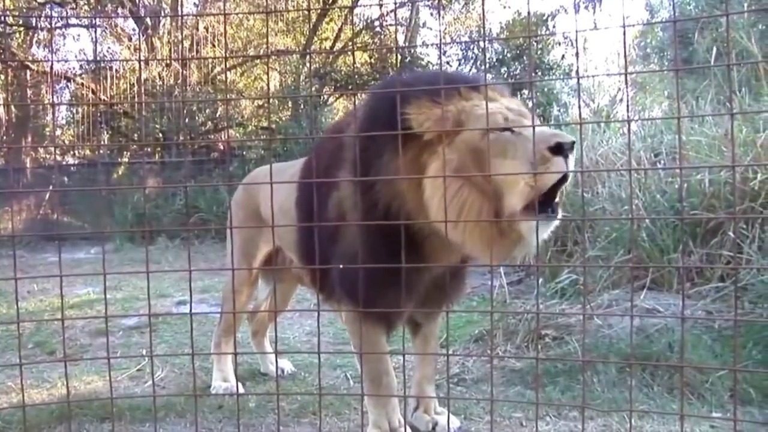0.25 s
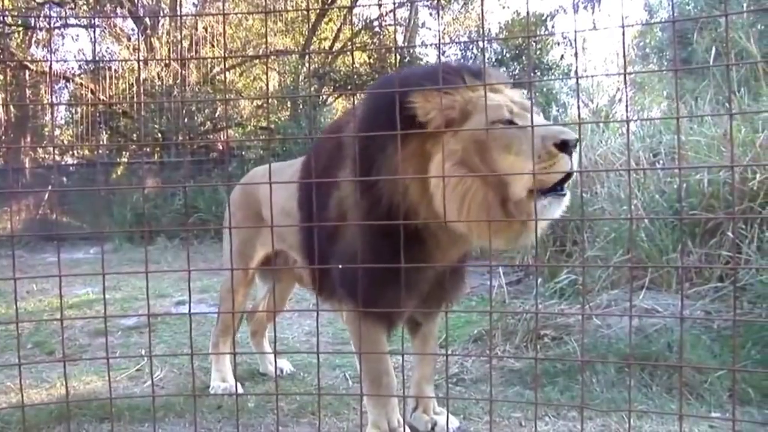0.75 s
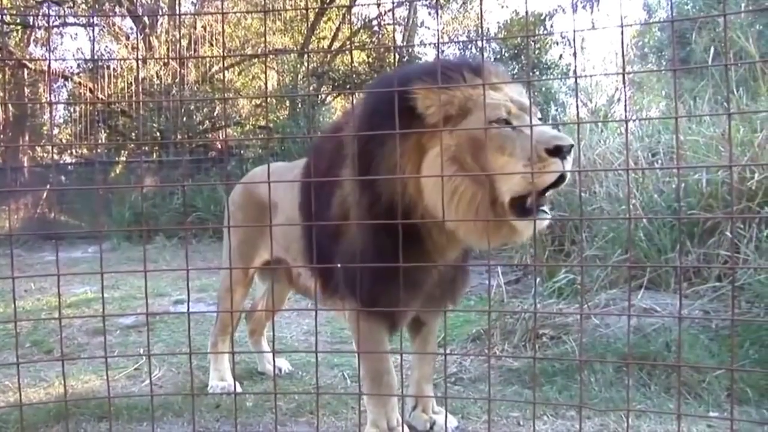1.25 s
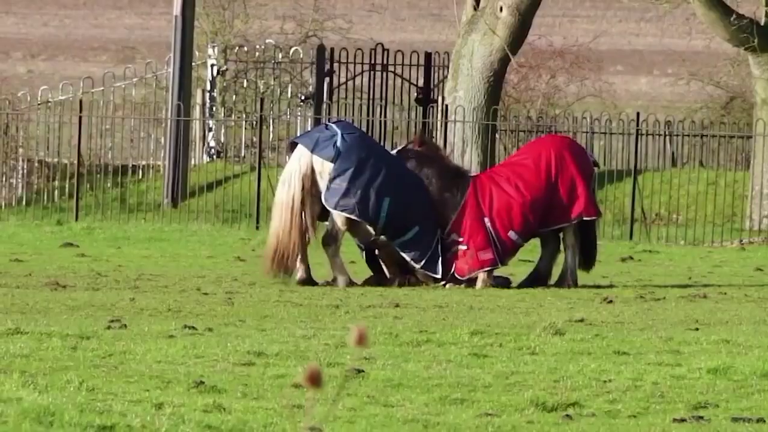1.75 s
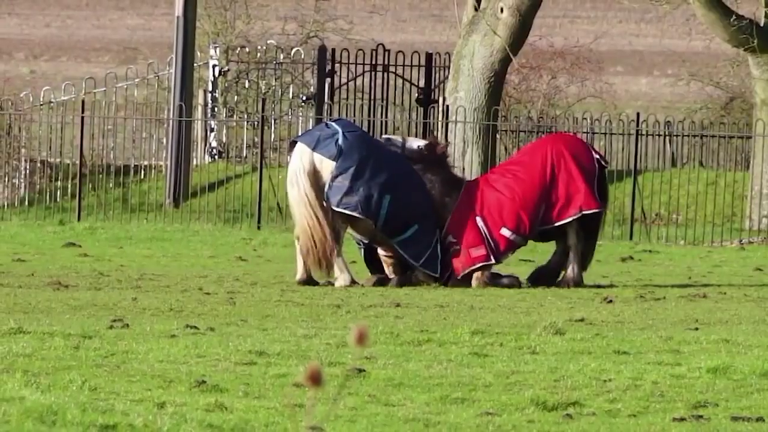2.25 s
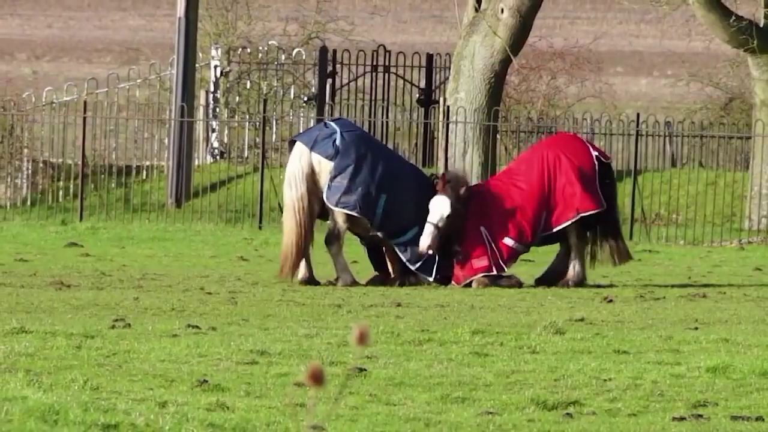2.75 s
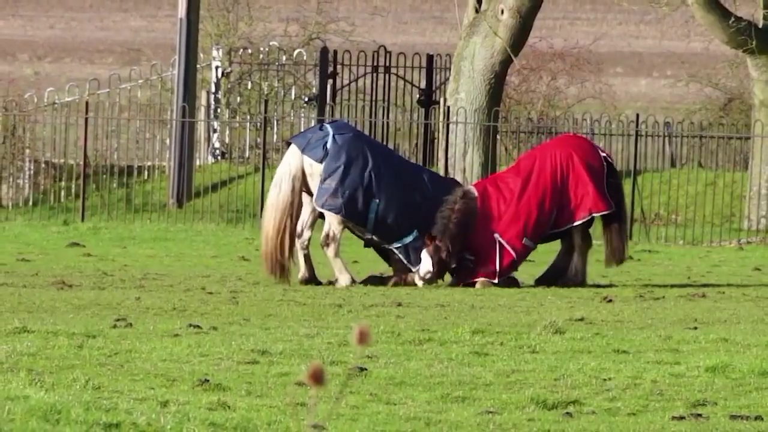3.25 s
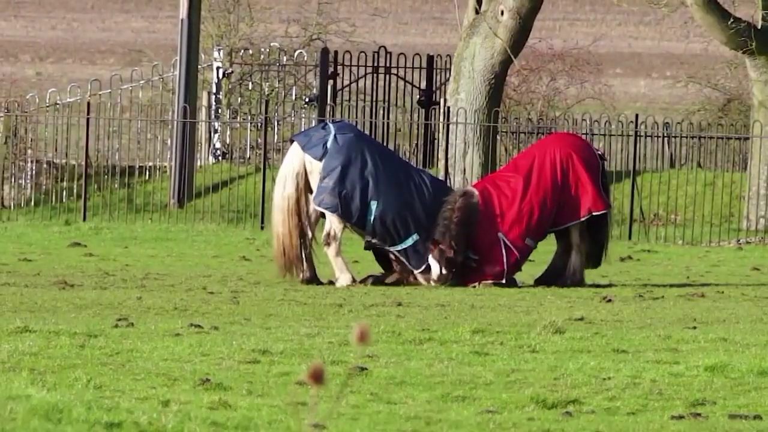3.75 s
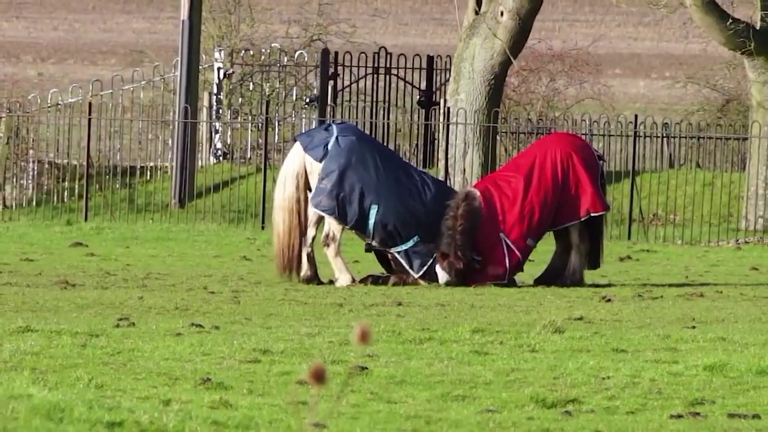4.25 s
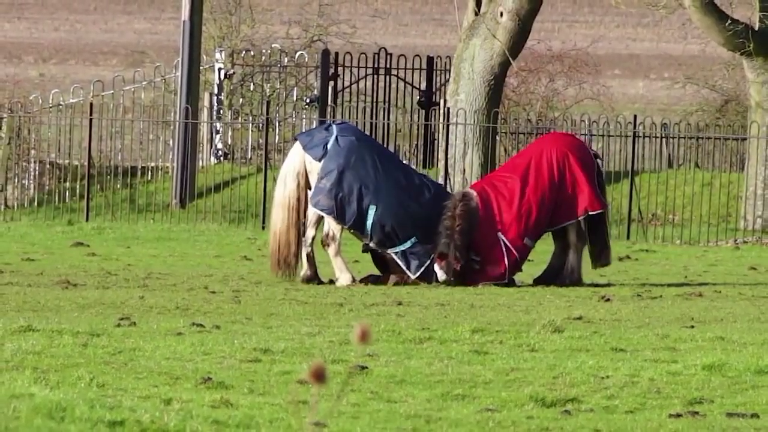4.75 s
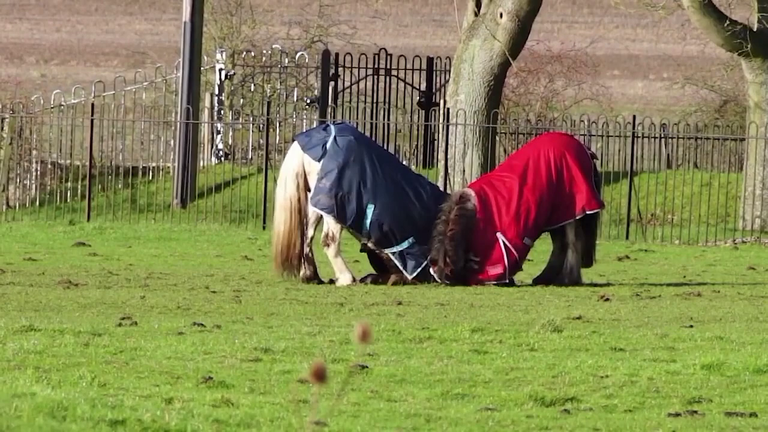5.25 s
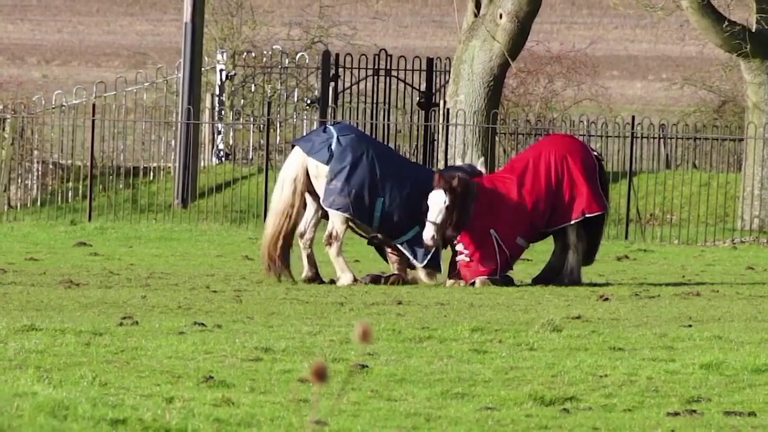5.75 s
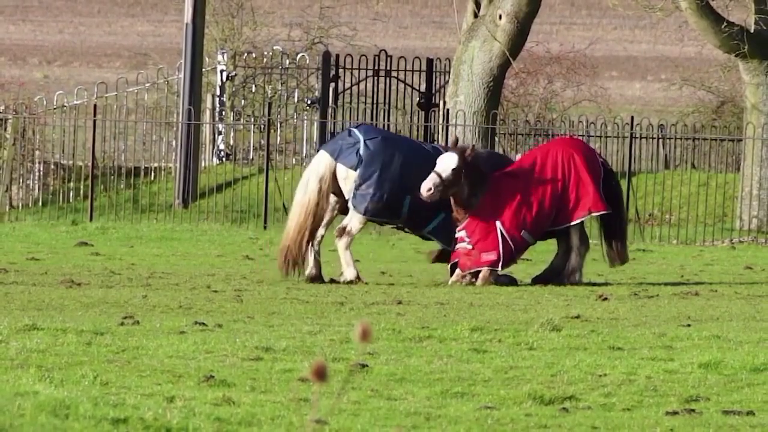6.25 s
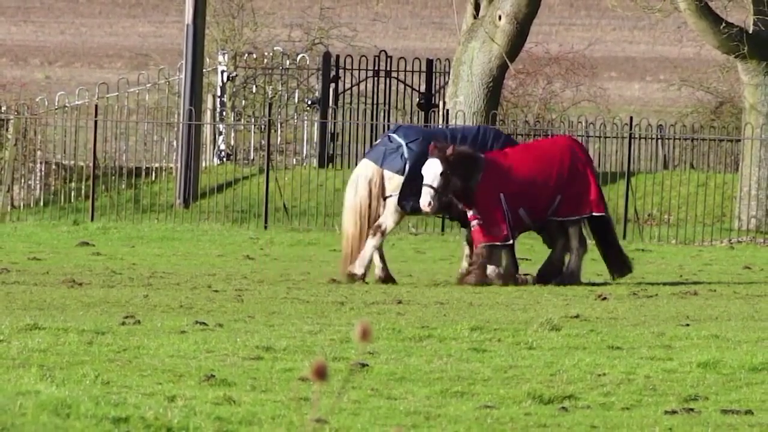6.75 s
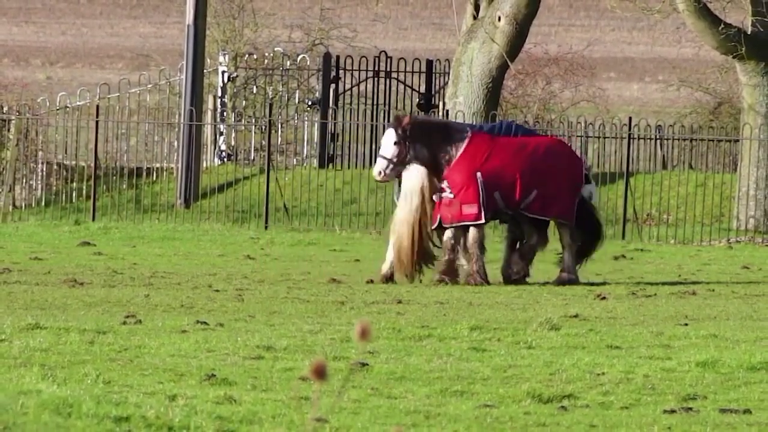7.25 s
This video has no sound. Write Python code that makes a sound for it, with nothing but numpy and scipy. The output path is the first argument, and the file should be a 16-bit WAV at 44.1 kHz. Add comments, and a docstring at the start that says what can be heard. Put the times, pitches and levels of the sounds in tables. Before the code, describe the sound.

One falling lion roar, then two quavering pony whinnies in a paddock, with light hoof scuffs and a snort between them.

```python
"""At an outdoor enclosure a lion gives one rough roar that sinks into a chesty hum, over a quiet rumble.
Then the scene changes to a paddock where two ponies spar in front of a stereo microphone: a whinny,
hooves and rugs scuffing on grass, a fluttering snort, a second whinny. Each whinny has two pitches at
once, a low voice and a high whistle, which shake together and modulate each other; each breaks into
beats and ends in a nicker."""
import sys
import numpy as np
from scipy import signal
from scipy.fft import rfft, irfft, next_fast_len
from scipy.io import wavfile
from scipy.ndimage import map_coordinates

SR = 44100
rng = np.random.default_rng(int(sys.argv[2]) if len(sys.argv) > 2 else 0)


def digitize_waveform(pressure):
    """Quantize a signal to 16-bit integers and store it at the path in sys.argv[1].

    Rows of a 2-D input are taken as channels; values are limited to [-1, 1].
    """
    field = np.atleast_2d(pressure).T
    bounded = np.clip(field, -1, 1)
    quanta = np.round(bounded * 32767).astype(np.int16)
    wavfile.write(sys.argv[1], SR, quanta)


N = 330428
PADDOCK_S = 1.678  # the scene changes from enclosure to paddock

# The lion's resonances. Each row: centre in Hz, width in Hz, gain in dB.
THROAT = [(212, 80, 2.5), (343, 36, 2), (493, 98, 3.5)]
MOUTH_OPEN = [(853, 80, -8.5), (1139, 150, -1)]
MUZZLE_DRAWN_BACK = [(1739, 100, 5.5), (2260, 260, 6), (3030, 140, 1), (3430, 230, -4.5), (3980, 140, -3),
                     (5030, 350, -11.5)]


def lion():
    """Heavy folds drive chest, throat and mouth; as the jaws close the low hum is left."""
    # Each row: time in seconds, pitch in Hz, effort in dB, mouth opening from 0 to 1.
    roar = [(0, 183.6, 4.5, 0.4), (.04, 182.9, -5.5, 0.87), (.105, 169.6, -4.5, 0.9),
            (.15, 168.8, -1.5, 0.93), (.22, 166.6, -3, 1), (.28, 161.2, -4, 0.9), (.315, 158.1, -2.5, 0.44),
            (.34, 175.6, 1, 0.4), (.38, 140.6, -4, 0.65), (.44, 135.4, -7.5, 0.7), (.5, 150.7, -2, 0.58),
            (.61, 141.1, 2, 0.42), (.68, 129.3, -1.5, 0.4), (.72, 122.3, -6.5, 0.62),
            (.78, 111.7, -1.5, 0.2), (.87, 104, -34.5, 1)]
    # With the lips pushed forward. Each row: resonance in Hz, width in Hz, gain in dB.
    mouth_pursed = [(855, 150, 1.5), (1120, 150, -0.5)]
    muzzle_pursed = [(1650, 170, 1), (2106, 550, 0.5), (2580, 220, -1.5), (3130, 520, -5.5), (3760, 100, 1),
                     (5290, 440, -14.5)]
    pitch, effort_db, opening = curves(roar)
    chesty = ramp(.305, .025)  # the voice drops from throat to chest
    pursed = ramp(.31, .16)
    jaws_db = np.maximum(-448 * after(.7384), -10.5)  # closing jaws muffle all but the hum
    mouth_db = -45 + effort_db + 20 * opening + jaws_db
    rasp_db = -32.5 + .3 * effort_db - 65.5 * after(.58) + jaws_db
    phase = turning(pitch, jitter=.016, rate=110)
    ragged = phase + .25 * wobble(170)
    voiced = folds(ragged, rough=.35, scatter_db=2)
    turbulent = folds(ragged + .6 * wobble(170), rough=.72, scatter_db=4)
    rattle = amp(1.6 * wobble(70))  # uneven flapping shakes the resonances together
    chest = amp(-29.5 + effort_db + 13.5 * chesty) * chest_hum(phase)
    throat = amp(-18 + effort_db - 11 * chesty + .86 * jaws_db) * throat_growl(phase, ragged)
    open_vowel = resonate(voiced * rattle, MOUTH_OPEN, top_hz=1740)
    pursed_vowel = resonate(voiced * rattle, mouth_pursed, top_hz=1740)
    mouth = amp(mouth_db) * ((1 - pursed) * open_vowel + pursed * pursed_vowel)
    rasp = np.sqrt(1 - pursed) * gurgle(turbulent * rattle, MUZZLE_DRAWN_BACK)
    rasp += np.sqrt(pursed) * gurgle(turbulent * rattle, muzzle_pursed)
    slaps = fold_slaps()
    air_past_teeth = amp(rasp_db - 15) * stereo_noise([(7000, -26.5), (10000, -9.5)], [(10000, .013)])
    voice = outdoors(throat + mouth + slaps, left_db=-4, wet_db=-9.5, t60=.13)
    voice += outdoors(chest + amp(rasp_db) * rasp, left_db=.2, wet_db=-11, t60=.17)
    return (voice + air_past_teeth) * during(0, .9, fade=.00079)


def folds(phase, rough, scatter_db):
    """Vocal folds give one pulse of uneven size per cycle, with breath let through once a cycle."""
    pulses = np.diff(np.floor(phase / (2 * np.pi)), prepend=0) * amp(scatter_db * wobble(110))
    breath = noise() * (4 + np.cos(phase))
    return np.sqrt(1 - rough) * unit(pulses) + np.sqrt(rough) * unit(breath)


def chest_hum(phase):
    """The chest hums; alternate cycles differ in size, which adds a faint line an octave down."""
    hum = np.sin(phase) * amp(1.9 * wobble(45)) + .09 * np.sin(phase / 2)
    return hum + amp(-34) * coloured(noise(), [(25, -4.5), (60, -12.5), (200, 2.5), (400, -48.5)])


def throat_growl(phase, ragged):
    """The throat moves between a clean third harmonic and a rough growl."""
    # Each row: time in seconds, clean share of the amplitude from 0 to 1.
    cleanness = [(0, 0.48), (.04, 1), (.07, 0), (.12, 0.83), (.2, 0.8), (.25, 0.07), (.3, 0.4), (.35, 0),
                 (.8, 0)]
    clean, = curves(cleanness)
    third = unit(np.sin(3 * phase)) * amp(wobble(47))
    growl = resonate(folds(ragged, rough=.52, scatter_db=5), THROAT, top_hz=784)
    return amp(3.5) * clean * third + np.sqrt(1 - clean ** 2) * growl


def gurgle(source, modes):
    """The wet throat gurgles: each resonance swells and shrinks on its own."""
    return unit(sum(amp(db + 2.6 * wobble(55)) * np.sqrt(width)
                    * resonate(source, [(hz, width, 0)], top_hz=5700) for hz, width, db in modes))


def fold_slaps():
    """Slack vocal folds slap, ringing throat and mouth and cracking in the muzzle."""
    # Each row: start in seconds, relative level in dB, extra gain for the mouth in dB.
    slaps = [(0.052, -2, -9.5), (0.073, -2, -9.5), (0.116, -1.5, -4), (0.149, -10, 1), (0.191, -8, 3),
             (0.241, 0, -8), (0.268, -6, -7), (0.332, -3.5, -12), (0.421, -9.5, -12.5), (0.453, -9, -10),
             (0.705, -7, -7), (.727, -9, -12)]
    starts, db, mouth_db = np.transpose(slaps)
    throat = bursts(starts, db - 15.5, attack=.0093, t60=.088) * resonate(noise(), THROAT, 930)
    mouth = bursts(starts, db + mouth_db - 9.5, attack=.006, t60=.08) * resonate(noise(), MOUTH_OPEN, 2480)
    crack = bursts(starts, db - 26, attack=.0026, t60=.088) * resonate(noise(), MUZZLE_DRAWN_BACK, 5446)
    return throat + mouth + crack


def whinny(contour, chokes, roughness, nasal, bright, *, voice_grows, side_db, overtone_db,
           voice_db, whistle_db, nasal_db, bright_db, air_db):
    """The low voice modulates the high whistle, setting side lines around the whistle's harmonics."""
    whistle_hz, voice_hz, effort_db, engaged_db = curves(contour)
    rough, = curves(roughness)
    gap = choking(chokes)
    sag = 1 - .03 * gap  # between beats the pitch sags and the call dulls
    low = turning(voice_hz * sag * (1 + .028 * wobble(60)), jitter=.035 * rough, rate=170)
    high = turning(whistle_hz * sag * (1 + .028 * rough * wobble(60)), .002 + .021 * rough, rate=220)

    def partial(phase, fray=1.7, flicker_db=4.7):
        """Every partial frays and flickers on its own."""
        frayed = phase + 2 * np.pi * rng.random() + fray * rough * wobble(110)
        return np.cos(frayed) * amp(flicker_db * wobble(30))

    voiced = np.clip(amp(engaged_db), 0, 1)  # without the low voice the call is a pure squeal
    squeal = sum(partial(k * high, 1, 2) * 1.7 / np.sqrt(k) for k in range(2, 7))
    sides = sum(partial(k * high + m * low) / np.sqrt(k) for k in range(1, 6) for m in (-1, 1))
    overtones = sum(partial(k * low) * 2 / k for k in range(2, 7))
    buzz = unit(squeal + voiced * (amp(side_db) * sides + amp(overtone_db) * overtones))
    source = buzz * (1 + .6 * rough * wobble(520) * voiced) + 1.15 * rough * voiced * noise()
    hoarse = .7 * rough * wobble(260)
    sounding = during(contour[0][0], contour[-1][0], fade=.0041)
    through = lambda spectrum: unit(coloured(source * sounding, spectrum)) * np.sqrt(sounding.mean())
    # Air through the nostrils. Each row: frequency in Hz, level in dB.
    breath = [(200, -39), (500, -1.5), (900, -7), (1500, -1), (2600, -5.5), (4000, -27.5)]
    call = amp(voice_db + voice_grows * effort_db + engaged_db - 10 * gap) * partial(low + hoarse, .8, 4)
    call += amp(whistle_db + .64 * effort_db - 11 * gap) * partial(high + hoarse * voiced, 0, 3)
    call += amp(nasal_db + effort_db + engaged_db - 14 * gap) * through(nasal)
    call += amp(bright_db + 1.63 * effort_db - 19 * gap) * through(bright)
    call += amp(air_db + effort_db + engaged_db - 10 * gap) * coloured(noise(), breath)
    low_cut_hz = 109.2  # keeps the call clear of low rumble
    return filtered(call * sounding, lambda hz: hz ** 6 / (hz ** 6 + low_cut_hz ** 6))


def choking(chokes):
    """How far a whinny is choked off (0-1): it swells roundly from one choke to the next."""
    times, depth = np.transpose(chokes)
    beat = np.interp(clock(), times, np.arange(len(times)))
    return np.interp(clock(), times, depth) * np.abs(np.cos(np.pi * beat)) ** 3.1


def whinnies():
    """Two calls that fall away in beats; the second is higher and opens as a squeal."""
    # Each row: time in seconds, whistle in Hz, voice in Hz, effort in dB, low voice engaged in dB.
    contour_1 = [(1.68, 1455, 490, -5, 0), (1.71, 1422, 480, -6, -1), (1.755, 1280, 420, -8, -1),
                 (1.795, 1362, 474, -4, 1), (1.835, 1235, 400, -4, 1), (1.87, 1325, 445, 0, -1),
                 (1.905, 1400, 492, 3, -1), (2.01, 1308, 480, -1, -1), (2.13, 1278, 482, -2, 0.5),
                 (2.245, 1174, 440, -2.5, 0), (2.36, 1108, 420, -7.5, 1), (2.48, 1038, 415, -14, 0),
                 (2.6, 985, 400, -20, 1), (2.85, 888, 380, -36, 0)]
    contour_2 = [(5.912, 1620, 590, -9.5, 0), (5.97, 1666, 582, -9.5, -25), (6.005, 1580, 595, -3, -24),
                 (6.055, 1565, 593, -11.5, -18.5), (6.1, 1657, 586, -6, -3), (6.16, 1734, 601.7, -2, -6),
                 (6.215, 1880, 637, -4, 2), (6.26, 1797, 616, -7.5, 4.5), (6.29, 1848, 614, -5, 2),
                 (6.325, 1737, 582.4, -5.5, -1), (6.385, 1846, 615, -5, 7), (6.425, 1625, 546, -3, 5),
                 (6.465, 1696, 584, -5, 6), (6.5, 1550, 531.4, 0.5, 4), (6.555, 1762, 618, 0, 4),
                 (6.635, 1641, 605, -4.5, 2), (6.725, 1600, 614.5, -3, 1.5), (6.82, 1473, 553, -6.5, -0.5),
                 (6.91, 1395, 525.4, -9, -2), (7.0, 1311, 513, -17, -2), (7.3, 1231, 487, -38.5, 1)]
    # The "ha-ha" beats. Each row: time of a choke in seconds, depth from 0 to 1.
    chokes_1 = [(1.76, 0), (1.849, 0.45), (1.955, 0.84), (2.068, 0.93), (2.183, 0.97), (2.297, 0.96),
                (2.412, 0.83), (2.53, .7), (2.65, 0.78), (2.77, 0.6)]
    chokes_2 = [(6.34, 0.032), (6.408, 0.58), (6.509, 0.53), (6.591, 0.77), (6.682, 0.83), (6.77, 1),
                (6.864, 0.91), (6.955, 0.95), (7.055, 0.79), (7.15, 0.82), (7.245, 0.833)]
    # Each row: time in seconds, roughness from 0 to 1.
    rough_1 = [(1.68, .42), (1.8, .62), (1.92, .48), (2.25, .38), (2.5, .45)]
    rough_2 = [(6.04, .26), (6.2, .55), (6.37, .58), (6.46, .8), (6.55, .53), (7.0, .52)]
    # Nasal passage and high overtones. Each row: frequency in Hz, gain in dB.
    nasal_1 = [(650, -48), (900, -9.5), (1300, -1), (1650, 4.5), (1900, 0.5), (2240, 5.5), (2600, -1),
               (2900, -9), (4000, -49.5)]
    nasal_2 = [(480, -40), (950, -11.5), (1250, -11), (1600, -0.5), (1900, 5), (2250, -2), (2900, 5),
               (3350, -26), (4200, -53)]
    bright_1 = [(2900, -18), (3300, 3.5), (4200, -3.5), (4600, -8), (5200, -11), (6200, -17), (8500, -24),
                (14000, -32)]
    bright_2 = [(2600, -68), (3300, 6), (3750, -8), (4300, 5), (5300, 1), (6600, -5.5), (8500, -14.5),
                (14000, -33)]
    first = whinny(contour_1, chokes_1, rough_1, nasal_1, bright_1,
                   voice_grows=.38, side_db=-1.5, overtone_db=-2,
                   voice_db=-38, whistle_db=-35, nasal_db=-33.5, bright_db=-36, air_db=-45)
    second = whinny(contour_2, chokes_2, rough_2, nasal_2, bright_2,
                    voice_grows=.47, side_db=1.5, overtone_db=1.5,
                    voice_db=-49.5, whistle_db=-48.5, nasal_db=-42.5, bright_db=-43.5, air_db=-58)
    return first + second


def snorts_and_nickers():
    """Blown air comes in puffs as the nostrils flap; in a nicker they flutter softly, ever slower."""
    # Each row: start of a snort's flap in seconds, relative level in dB.
    flaps = [(1.683, -24), (1.698, -19.5), (1.716, -20.5), (1.734, -19.5), (5.474, -28.5), (5.503, -25),
             (5.529, -25), (5.567, -20.5), (5.606, -27), (5.645, -28), (5.687, -26), (5.712, -26),
             (5.752, -26.5), (5.793, -28), (5.846, -29.5), (5.895, -33)]
    # Each row: start, length and first gap between flaps in seconds, relative level in dB.
    nickers = [(2.387, .44, .026, -34), (6.857, .43, .03, -46)]
    # The flow of air. Each row: start and length in seconds, level at the crest in dB.
    blows = [(2.38, 0.45, -64), (5.478, .36, -39), (6.856, 0.33, -83)]
    # Each row: frequency in Hz, gain of the nostrils in dB.
    nostril = [(40, -33.5), (90, -9.5), (200, 0), (320, -6), (730, -1.5), (970, 0.5), (1300, -9.5),
               (2300, -13), (3300, -24), (8000, -31), (14000, -30.5)]
    crest_s, attack_s, release_s, gap_growth = .058, .098, .052, 1.085
    swell_db = lambda t: np.minimum(50 * (t - crest_s), 23 * (crest_s - t))
    starts, levels = np.transpose(flaps)
    gaps = np.minimum(np.diff(starts, append=N / SR), .05)
    # slow flaps are looser and longer than quick ones
    puffs = sum(bursts([start], [db - 11], attack=.19 * gap, t60=1.7 * gap)
                for start, db, gap in zip(starts, levels, gaps))
    for start, length, gap, db in nickers:
        t = gap * (gap_growth ** np.arange(24) - 1) / (gap_growth - 1)
        t = t[t < length]
        puffs += bursts(start + t, db - 9 + swell_db(t) + rng.normal(0, 1, len(t)), attack=.003, t60=.06)
    blow = np.zeros(N)
    for start, length, db in blows:
        flow = ramp(start - attack_s / 2, attack_s) * (1 - ramp(start + length, release_s))
        blow += flow * amp(db + swell_db(clock() - start))
    return coloured(np.hypot(blow, puffs) * (clock() > PADDOCK_S) * noise(), nostril)


def hooves():
    """Hooves and knees land on turf: a crunch of grass and a dull thud of soil."""
    # Each row: start in seconds, relative level in dB, extra gain for the thud in dB.
    steps = [(1.932, -25, -7), (3.413, -37, -8.5), (3.485, -36.5, -3.5), (3.776, -26.5, -33),
             (3.897, -33, -22), (4, -43.5, 0), (4.318, -35.5, -8), (4.545, -37.5, -32), (5.065, -47, 3)]
    starts, db, thud_db = np.transpose(steps)
    # Each row: frequency in Hz, level in dB.
    turf = [(50, -38.5), (130, -3.5), (550, 3.5), (1500, -7), (3000, -21.5), (8000, -42.5)]
    soil = [(60, -39), (150, 1.5), (500, -1.5), (900, -21), (1800, -52.5)]
    crunch = coloured(bursts(starts, db - 8.5, attack=.0015, t60=.039) * noise(), turf)
    thud = coloured(bursts(starts, db + thud_db - 2.5, attack=.0021, t60=.054) * noise(), soil)
    return crunch + thud


def rugs():
    """The ponies' rugs rub together in grainy strokes."""
    # Each row: start and length in seconds, level in dB.
    rubs = [(3.466, 0.044, -48.5), (3.531, 0.052, -53)]
    # Each row: frequency in Hz, level in dB.
    cloth = [(70, -32), (400, 4), (1200, -3), (3500, -8), (5000, -21), (12000, -36.5)]
    grain = unit(coloured(noise() * amp(2.9 * wobble(120)), cloth))
    return grain * sum(amp(db) * stroke(start, length, .01, 224) for start, length, db in rubs)


def paddock_rustle():
    """Background rustle and low rumble swell and fade, with brief scuffs on grass."""
    # Each row: start and length in seconds, fall in dB a second, relative rustle and rumble in dB.
    swells = [(1.658, 0.027, 101, -28, -47), (1.802, 0.14, 88, -43, -51), (2.166, 0.4, 36.5, -42.5, -53),
              (3.407, 0.32, 100, -67, -85), (3.656, 0.046, 150, -59.5, -83),
              (3.807, 0.067, 104, -58.5, -70.5), (3.919, 0.046, 250, -55, -74.5),
              (4.18, 0.034, 150, -58.5, -84), (4.318, 0.032, 150, -65, -75), (4.57, 0.11, 81, -55, -85),
              (5.014, 0.028, 150, -67, -67), (6.737, 0.14, 20.5, -57, -79.5)]
    # Each row: time in seconds, relative level of the steady rustle in dB.
    bed = [(1.7, -51.5), (5.4, -61), (6.05, -66.5), (7.45, -70.5)]
    # Each row: frequency in Hz, level in dB.
    rustle_spectrum = [(40, -41.5), (70, -81.5), (105, -0.5), (300, -1), (550, 0), (800, -7.5), (1350, -9),
                       (2100, -16), (9000, -46.5)]
    rumble_spectrum = [(30, -60), (48, -28), (70, -2), (140, 0), (220, -5), (400, -30)]
    envelopes = np.array([stroke(start, length, .041, fall) for start, length, fall, *_ in swells])
    rustle_gain, rumble_gain = amp(np.array(swells)[:, -2:].T) @ envelopes
    rustle_gain = np.hypot(rustle_gain, amp(curves(bed)[0])) * amp(-57.5 * after(7.09))
    rustle_gain *= amp(4 + 1.9 * wobble(35))
    rustle = rustle_gain * stereo_noise(rustle_spectrum, [(700, .86), (1400, .86), (3000, .065)])
    return rustle + rumble_gain * coloured(noise(), rumble_spectrum)


def paddock_hiss():
    """A fine, wide hiss that swells and sinks."""
    # Each row: time in seconds, relative level in dB.
    levels = [(1.72, -62), (1.92, -51), (2.45, -65), (3.6, -64.5), (5.4, -72), (6.3, -62.5), (6.8, -71.5),
              (7.4, -92)]
    # Each row: frequency in Hz, level in dB.
    spectrum = [(1500, -5), (3500, 2), (8000, -2), (11000, -2), (14500, -0.5)]
    return amp(curves(levels)[0] + 7 + .26 * wobble(46)) * stereo_noise(spectrum, [(3000, .014)])


def enclosure_rumble():
    """A quiet outdoor rumble around the lion."""
    # Each row: frequency in Hz, level in dB.
    spectrum = [(25, -18.5), (100, 0.5), (190, -6), (350, -21.5), (600, -26.5), (1250, -19.5), (3200, -34),
                (8000, -44)]
    return amp(-60 + 1.9 * wobble(32)) * stereo_noise(spectrum, [(150, 1), (3000, .2)])


def outdoors(x, left_db, wet_db, t60):
    """Place a source; fences and trees scatter a short tail, different on each side of the microphone."""
    t = np.arange(SR // 3) / SR
    tail = rng.standard_normal((2, len(t))) * amp(-60 * t / t60) * (t > .004)
    echo = signal.fftconvolve(x[None], tail / np.linalg.norm(tail[0]), axes=1)[:, :N]
    direct = x * amp([[left_db / 2], [-left_db / 2]])
    return direct + amp(wet_db) * filtered(echo, lambda hz: hz / (hz + 250))


def amp(db):
    """Decibels to gain."""
    return 10 ** (np.asarray(db) / 20)


def unit(x):
    """Scale to rms 1."""
    return x / np.sqrt(np.mean(x ** 2) + 1e-20)


def clock():
    """The time of every sample."""
    return np.arange(N) / SR


def after(start):
    """Seconds elapsed since a time, 0 before it."""
    return np.maximum(clock() - start, 0)


def ramp(start, length):
    """A straight rise from 0 to 1."""
    return np.clip(after(start) / length, 0, 1)


def during(start, end, fade):
    """1 between two times, with short ramps."""
    return ramp(start, fade) * np.clip((end - clock()) / fade, 0, 1)


def stroke(start, length, attack, fall):
    """An envelope that rises, holds and falls by so many dB a second."""
    return ramp(start, attack) * amp(-fall * after(start + length))


def bursts(starts, dbs, attack, t60):
    """An envelope that jumps at each start and dies away."""
    envelope, t = np.zeros(N + SR), np.arange(SR // 4) / SR
    shape = (1 - np.exp(-t / attack)) * amp(-60 * t / t60)
    for start, db in zip(starts, dbs):
        envelope[round(start * SR):][:len(t)] += amp(db) * shape / shape.max()
    return envelope[:N]


def curves(rows):
    """One value per sample for each column after the time."""
    times, *columns = np.transpose(rows)
    return [np.interp(clock(), times, column) for column in columns]


def wobble(rate):
    """A smooth random curve, rate knots a second."""
    return map_coordinates(rng.standard_normal(int(N * rate / SR) + 4), [clock() * rate], order=2)


def turning(hz, jitter, rate):
    """Phase of an oscillator whose pitch trembles."""
    return 2 * np.pi * np.cumsum(hz * (1 + jitter * wobble(rate))) / SR


def noise():
    """White noise of rms 1."""
    return rng.standard_normal(N)


def stereo_noise(spectrum, likeness):
    """Noise of rms 1 with a (Hz, dB) spectrum and a (Hz, left-right likeness) profile."""
    angle = lambda hz: np.arccos(np.clip(along(likeness, hz), -1, 1)) / 2
    response = lambda hz: amp(along(spectrum, hz)) * [np.cos(angle(hz)), np.sin(angle(hz))]
    mid, side = filtered(np.array([noise(), noise()]), response)
    return unit(np.array([mid + side, mid - side]))


def filtered(x, response):
    """x times a complex response of frequency."""
    size = next_fast_len(N + 8192)
    return irfft(rfft(x, size) * response(np.fft.rfftfreq(size, 1 / SR)), size)[..., :N]


def along(points, hz):
    """Interpolate (Hz, value) points on a log axis."""
    freqs, values = np.transpose(points)
    return np.interp(np.log(hz + 1), np.log(freqs), values)


def coloured(x, spectrum):
    """x through a (Hz, dB) spectrum; white noise keeps its power."""
    return filtered(x, lambda hz: unit(amp(along(spectrum, hz))))


def resonate(x, modes, top_hz):
    """x through steep-sided resonances, rolling off above top_hz, at rms 1."""
    peak = lambda hz, centre, width: 1j * hz * width / (centre ** 2 - hz ** 2 + 1j * hz * width)
    rung = filtered(x, lambda hz: sum(amp(db) * peak(hz, centre, width) ** 2 for centre, width, db in modes))
    return unit(signal.sosfilt(signal.butter(6, top_hz, fs=SR, output="sos"), rung))


def scene():
    """The lion in its enclosure, then the ponies in the paddock, where the background leans right."""
    ponies = outdoors(whinnies(), left_db=-1, wet_db=-6.5, t60=.22)
    ponies += outdoors(snorts_and_nickers(), left_db=4, wet_db=-3, t60=.12)
    ponies += outdoors(hooves() + rugs(), left_db=-4, wet_db=-3.5, t60=.25)
    roar = lion()
    background = enclosure_rumble() * (clock() < PADDOCK_S)
    background += (paddock_rustle() + paddock_hiss()) * during(PADDOCK_S, N / SR, fade=.0083)
    left_db, = curves([(1.7, 0), (2.7, -3), (5.3, -3), (5.7, -6), (6.3, -3)])
    return roar + ponies + background * amp([left_db / 2, -left_db / 2])


def record(dry):
    """Nothing is kept above 15.5 kHz."""
    return filtered(dry, lambda hz: hz < 15500)


dry = scene()
out = record(dry)
digitize_waveform(out)
```